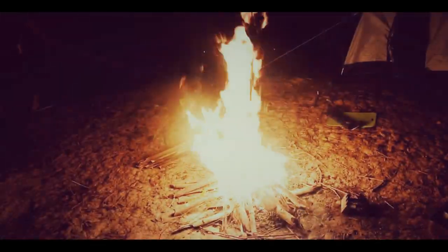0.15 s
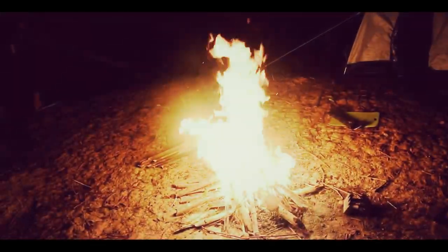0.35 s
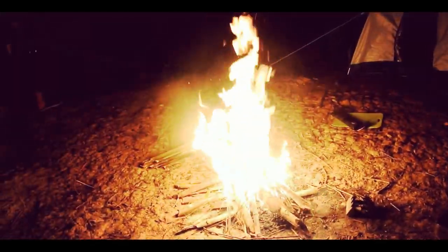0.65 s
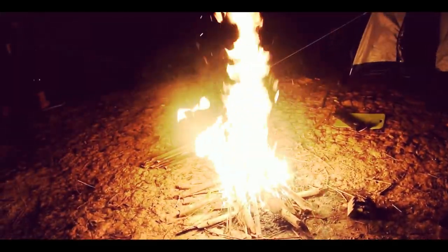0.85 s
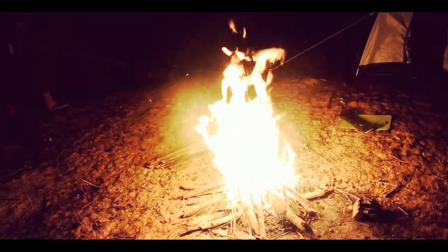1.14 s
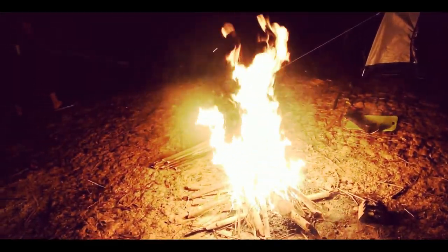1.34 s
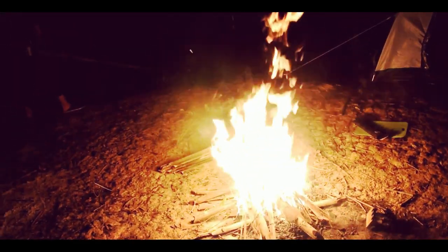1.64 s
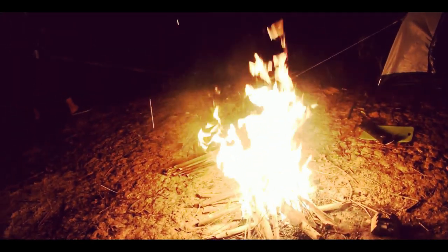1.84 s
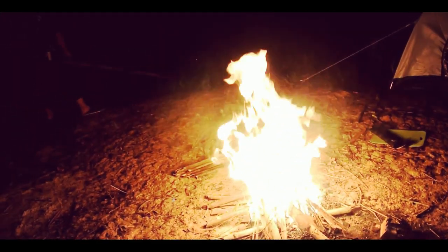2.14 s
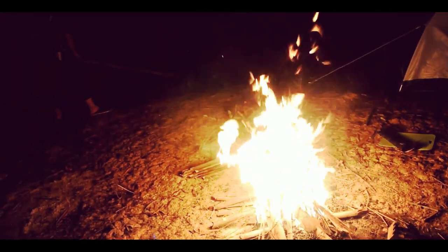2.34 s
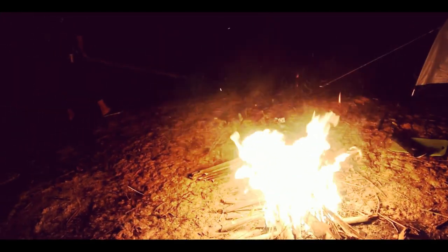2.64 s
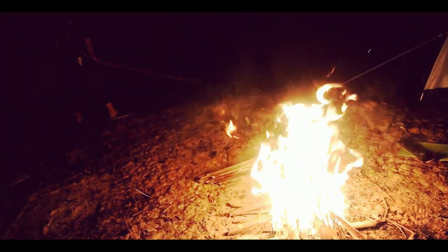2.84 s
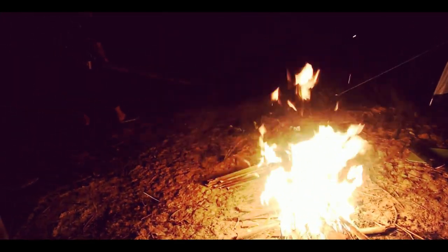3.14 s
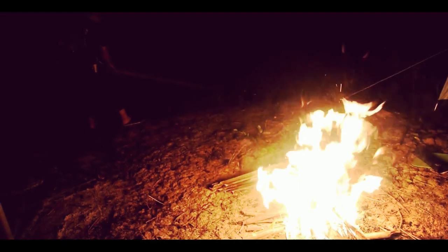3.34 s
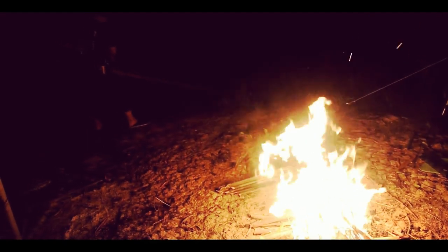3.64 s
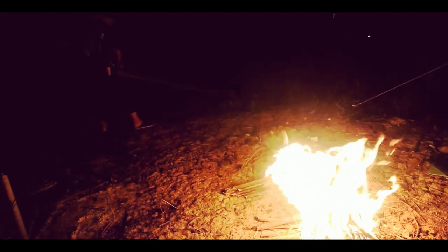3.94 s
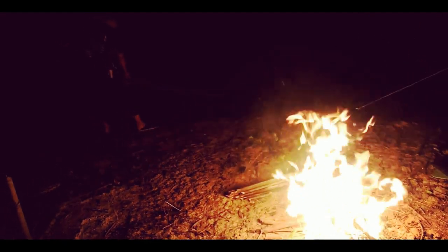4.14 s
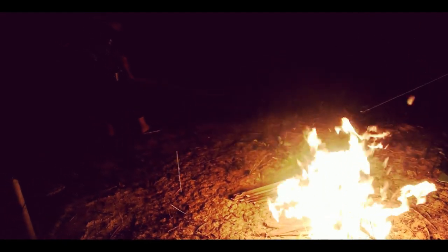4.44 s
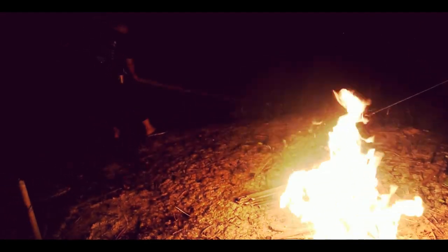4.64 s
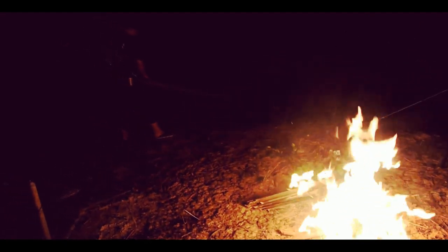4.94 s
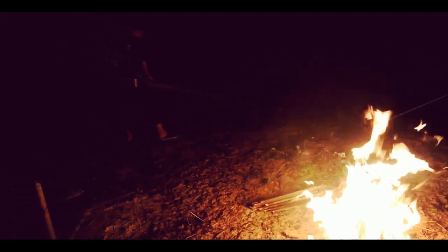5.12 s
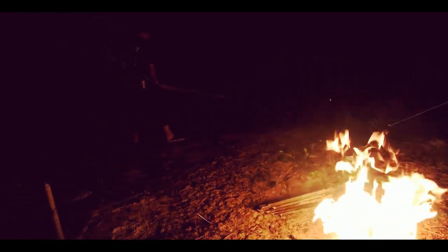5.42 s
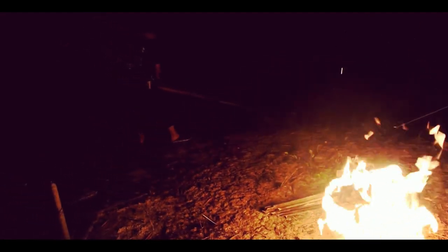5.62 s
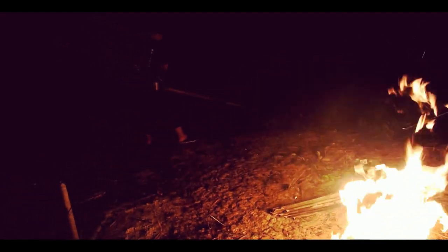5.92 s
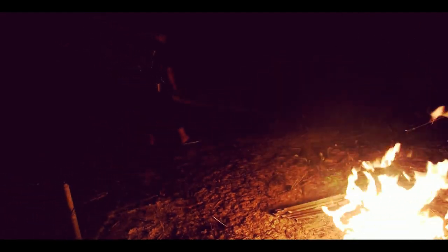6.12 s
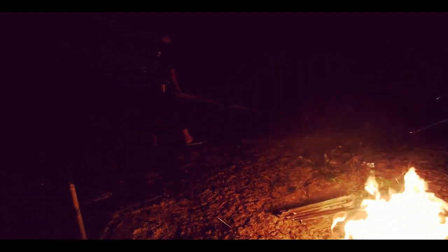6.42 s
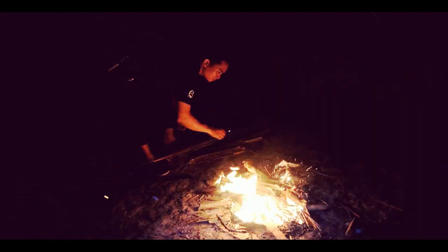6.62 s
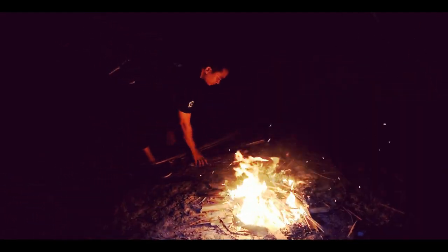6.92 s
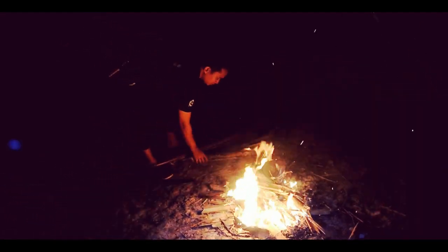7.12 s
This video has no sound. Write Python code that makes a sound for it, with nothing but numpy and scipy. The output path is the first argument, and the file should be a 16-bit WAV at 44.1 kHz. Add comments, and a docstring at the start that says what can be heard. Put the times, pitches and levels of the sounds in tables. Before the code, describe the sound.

A stick fire burns close to a stereo microphone outdoors at night. Throughout, flames flutter in the bass and rush softly above, with dense tiny ticks, dull little knocks and dry spark flicks. Behind, crickets trill continuously around a high whistle-like pitch, katydids hiss higher still, and faint far trills rise and fall. Bright snaps cluster from 0.4 to 0.8 seconds with a small burst at 0.65; another hollow pop comes at 1.3. A strong bang with steam hits at 2.0, a lesser one at 2.2. Sharp snaps crack at 3.3 and 4.2, around a very loud, overloading bang and hiss at 4.0. Smaller bursts and a piercing snap come at 5.3 to 5.6, then another huge bang at 6.0. A near cricket chirps around 0.5-1.9, 3.0-4.3 and 6.3-7.2. After 6.7 the fire's flutter and crackle drop slightly, with a sharp snap at 6.95.

```python
"""Outdoors at night, a tall stick fire: splitting wood ticks and knocks, made of short fading noise.
Sealed stalks burst with a bang of ringing tones and an air thump, then hiss out steam as fading noise.
The flames flutter and rush as slowly wavering noise. Behind them crickets trill and chirp
(wavering tones and narrow noise) and katydids hiss; the loudest bangs overload the microphone."""
import sys
import numpy as np
from scipy import signal
from scipy.fft import rfft, irfft, next_fast_len
from scipy.io import wavfile
from scipy.ndimage import map_coordinates

SR = 44100
rng = np.random.default_rng(int(sys.argv[2]) if len(sys.argv) > 2 else 0)


def master(y):
    """Save y as 16-bit WAV."""
    cut = np.clip(np.atleast_2d(y).T, -1, 1)
    pcm = np.round(cut * 32767)  # scale
    wavfile.write(sys.argv[1], SR, pcm.astype(np.int16))


N = 320607  # length in samples

# Fibres snapping at the surface. Positive left_right_db is louder on the left.
# Columns: start_s, snap_level_db, snap_pitch_hz, left_right_db [s, relative dB, Hz, dB]
SURFACE_SNAPS = [(0.055, -13, 7000, -1), (0.111, -12.5, 6000, -2), (.446, -10, 10400, 15),
                 (.448, -2, 10500, -6), (.502, -6.5, 4260, 3), (.512, -11, 6950, 5), (0.543, -9.5, 7060, 3),
                 (.672, -7, 5900, 5), (0.694, -6, 13400, 7), (.779, -12, 4900, 3), (1.187, -11.5, 6500, 4),
                 (1.874, -7, 3940, -1), (2.345, -9, 6000, 1), (3.329, -3, 12200, 3), (3.7, -18, 8500, 11),
                 (4.197, -2.5, 8800, 5), (5.537, 2.5, 12600, 3), (6.955, 0.5, 5630, -5),
                 (7.209, -13.5, 13500, 6)]
SNAP_KNOCK_DB, SNAP_KNOCK_HZ = -35, 1770  # faint knock under a snap: dB against the snap, pitch
# Sticks splitting inside the pile.
# Columns: start_s, knock_level_db, knock_pitch_hz [s, relative dB, Hz]
DEEP_KNOCKS = [(1.045, -36.5, 1200), (1.381, -34.5, 500), (2.084, -20, 653), (2.248, -26, 1040),
               (2.819, -26.5, 2060), (3.228, -29.5, 1730), (3.315, -29, 760), (3.431, -28.5, 3460),
               (4.511, -29.5, 735), (4.562, -31.5, 1070), (4.983, -31, 1700), (5.29, -26.5, 860),
               (5.511, -28, 700), (6.589, -31, 740)]
KNOCK_SNAP_DB, KNOCK_SNAP_HZ = 9.5, 3020  # snap on a knock: dB against the knock, pitch
# Sealed stalks bursting; the bangs, steam and torn fibres below use it too.
# Columns: start_s, snap_level_db, snap_pitch_hz, knock_level_db, knock_pitch_hz, hollow_level_db,
# hollow_pitch_hz, steam_level_db, full_flow_s, left_right_db [s, Hz, relative dB]
STALK_BURSTS = [(.652, -3, 2530, -24.5, 1300, -22.5, 617, -31, .04, 4.5),
                (1.325, -11, 10200, -25, 1110, -14.5, 546, -32, .022, 6),
                (2.0, -2.5, 2250, -13, 1550, -11, 400, -17, .054, 3),
                (2.2, -8, 1260, -18, 1010, -15, 1180, -32, 0.022, -3),
                (3.979, 4.5, 3100, -13.5, 857, -3, 1400, -17, .048, -1),
                (5.272, -16, 2200, -24, 2360, -20, 1700, -32.5, .018, -12),
                (5.554, -6.5, 11200, -25, 1070, -29, 600, -19, .025, 11),
                (6.001, 4.5, 2400, -12.5, 1550, -4, 700, -16, .046, -7)]


def pops():
    """Surface splits are nearly all snap, deep ones mostly knock, bursts both; returns (snaps, knocks)."""
    splits = []
    for s, db, hz, pan_db in SURFACE_SNAPS:
        splits.append((s, split(db, hz, db + SNAP_KNOCK_DB, SNAP_KNOCK_HZ, pan_db)))
    for s, db, hz in DEEP_KNOCKS:
        splits.append((s, split(db + KNOCK_SNAP_DB, KNOCK_SNAP_HZ, db, hz, pan_db=1.6)))
    for s, snap_db, snap_hz, knock_db, knock_hz, *_, pan_db in STALK_BURSTS:
        splits.append((s, split(snap_db, snap_hz, knock_db, knock_hz, pan_db)))
    snaps, knocks = np.zeros((2, 2, N))
    for s, (snap, knock) in splits:
        add(snaps, s, snap)
        add(knocks, s, knock)
    return snaps, knocks


# Tone colour of snapping fibres, shared by all ticks. Columns: pitch_hz, level_db [Hz, relative dB per Hz]
SNAP_COLOUR = [(100, -1), (600, -11), (2000, -2.5), (4000, 2.5), (8000, 0), (11500, 3.5), (15500, -2)]
# Tone colour of a knocking stick. Columns: pitch_hz, level_db [Hz, relative dB per Hz]
KNOCK_COLOUR = [(25, -33), (120, -30), (260, -4.5), (420, -14.5), (650, 1), (1800, -0.5), (3200, -5),
                (7000, -19.5)]


def split(snap_db, snap_hz, knock_db, knock_hz, pan_db):
    """A bright snap of fibres and a slower hollow knock of the stick; returns (snap, knock)."""
    heft = min(amp(knock_db + 17.5), 1)  # heavy splits run on for longer
    snap_s = .006 + .013 * heft
    knock_s, ring_db = 1.7 * snap_s, 9.5
    snap = burst(SNAP_COLOUR, snap_hz, q=2.3, ring_db=ring_db, t60=snap_s)
    knock = burst(KNOCK_COLOUR, knock_hz, q=4.5, ring_db=ring_db, t60=knock_s)
    return amp(snap_db - 5.0) * panned(pan_db + 1.7) * snap, amp(knock_db + 7.0) * knock


def burst(spectrum, ring_hz, q, ring_db, t60):
    """A fracture: noise that starts at once and dies fast, with one resonance of the stick standing out."""
    t = np.arange(SR // 20) / SR
    fade = amp(-60 * t / max(t60, .002)) * (1 - np.exp(-t / 0.00015))

    def colour(hz):
        return shape(spectrum)(hz) * (1 + amp(ring_db) * band(ring_hz, ring_hz / q)(hz))

    x = fade * noise(colour, size=len(t))
    # each side gets the same energy, whatever the random noise was
    return np.array([unit(side) for side in x]) * np.sqrt(np.mean(fade ** 2))


# Tones (modes) that a stalk's hollow can ring at. Columns: pitch_hz, level_db [Hz, relative dB]
HOLLOW_MODES = [(245, -2), (318, 3), (490, -3.5), (605, -0.5), (767, -0.5), (1390, -1.5), (1870, 0.5)]
HOLLOW_T60_S = 0.038  # time to fall 60 dB at 500 Hz; low modes last longer
HOLLOW_FALL_DB = 16  # per octave that a mode lies from the pitch of the hollow
# air thump: dB at a listed snap level of 0 dB, dB gained per dB of snap, time scale
THUMP_DB, THUMP_GROWS, THUMP_S = -43, 5.1, .0034


def bangs():
    """A bursting stalk shoves the air once; the modes near the pitch of its hollow ring for a few cycles."""
    out, t = np.zeros((2, N)), np.arange(SR // 10) / SR
    u = t / THUMP_S
    shove = (1 - u) * np.exp(-u)  # a push, then a gentler pull
    for s, snap_db, _, _, _, hollow_db, hollow_hz, *_ in STALK_BURSTS:
        add(out, s, amp(THUMP_DB + THUMP_GROWS * snap_db) * shove * panned(1.9))
        for hz, db in HOLLOW_MODES:
            t60 = HOLLOW_T60_S * np.sqrt(500 / hz)
            mode_db = hollow_db + db - HOLLOW_FALL_DB * abs(np.log2(hz / hollow_hz))
            swing = amp(mode_db - 60 * t / t60) * np.sin(2 * np.pi * hz * t)
            pressure = np.gradient(swing) * SR / (2 * np.pi * hz)  # follows the change of flow
            late_s = 0.002964 * rng.random()  # modes start as the crack runs along
            add(out, s + late_s, pressure * panned(.69))
    return out


# Tone colour of the steam's hiss. Columns: pitch_hz, level_db [Hz, relative dB per Hz]
STEAM_COLOUR = [(100, -33), (300, -1.5), (450, -17.5), (700, -18.5), (1200, -22), (2000, -4.5), (4000, 1),
                (7000, 0), (10500, 0.5), (13000, -1), (15800, -10.5)]
# Tone colour of the steam's roar. Columns: pitch_hz, level_db [Hz, relative dB per Hz]
ROAR_COLOUR = [(30, -77), (130, -43), (280, -20), (420, -7), (700, -2), (1400, -0.5), (3000, -1),
               (7000, -9)]
FADE_OVER_FLOW = 10.4  # the steam's 60 dB fade time over its time at full flow
ROAR_DB, ROAR_GROWS = 7.5, 2.005  # roar at a listed knock level of 0 dB; dB gained per dB of knock


def jets():
    """Steam blows at full flow, then fades with the pressure; harder bursts add a stronger, lower roar."""
    out, t = np.zeros((2, N)), np.arange(SR // 2) / SR
    onset = 1 - np.exp(-t / 0.00085)
    for s, _, _, knock_db, *_, steam_db, hold, _ in STALK_BURSTS:
        past_full_s = np.hypot(np.maximum(t - hold, 0), .01) - .01  # rounded corner into the fade
        flow_db = -60 * past_full_s / (FADE_OVER_FLOW * hold)
        sputter_db = .8 * wobble(130, size=len(t))
        hiss = amp(steam_db + flow_db) * noise(shape(STEAM_COLOUR), size=len(t)) * panned(2.9)
        roar_db = ROAR_DB + ROAR_GROWS * knock_db + 0.67 * flow_db - 33 * t
        roar_db = roar_db + 1.9 * wobble(72, size=len(t))
        roar = amp(roar_db) * noise(shape(ROAR_COLOUR), size=len(t))
        add(out, s, amp(sputter_db) * onset * (hiss + roar))
    return out


# Runs of small splits as sticks settle; each split is up to 6 dB above the level before tick and knock trims.
# Columns: start_s, length_s, level_db [s, s, relative dB]
SETTLING_RUNS = [(0.626, 0.06, -30.5), (2.631, 0.18, -35.5), (3.155, 0.11, -35), (4.171, 0.049, -30),
                 (4.48, .091, -34.5), (4.85, 0.24, -33.5), (5.245, 0.069, -29), (5.459, 0.092, -29),
                 (6.177, 0.032, -31.5), (6.305, 0.062, -35.5), (6.568, 0.047, -35.5)]


def crackle(count=130, order=8):
    """Many small splits deep in the pile, duller runs where sticks settle, and fibres torn by the steam."""
    out = np.zeros((2, N))
    for when, size, bright, pitch, place in rng.random((count, 5)):
        add(out, when * N / SR, small_split(-36 + 12 * size ** 3, bright, pitch, place))
    for s, length, db in SETTLING_RUNS:
        for k, (when, size, bright, pitch, place) in enumerate(rng.random((order, 5))):
            start_s = s + length * (k + when) / order
            add(out, start_s, small_split(db + 6 * size, bright ** 3 / 2, pitch, place))
    for s, *_, steam_db, hold, _ in STALK_BURSTS:
        for when, size, bright, pitch, place in rng.random((order, 5)):
            tear_db = steam_db - 4 + 9 * size - 9 * when
            add(out, s + 2 * hold * when, small_split(tear_db, bright, pitch, place))
    return out


def small_split(db, bright, pitch, place):
    """A thin tick and a dull little knock; bright, pitch and place run from 0 to 1."""
    tick = burst(SNAP_COLOUR, 3000 * 4 ** pitch, q=1, ring_db=16, t60=0.01)
    knock = burst(KNOCK_COLOUR, 500 * 4 ** pitch, q=2.8, ring_db=2.5, t60=0.028)
    tick = amp(db + 6.8 * (bright + 0.5)) * tick * panned(2.5 + 6 * (place - .5))
    return tick + amp(db - 3.5 - 7.3 * bright) * knock


def sparks(count=70):
    """Tiny flakes of bark flick off with very short, dry, high ticks."""
    out = np.zeros((2, N))
    for when, size, pitch, place in rng.random((count, 4)):
        db = -32 + 14 * size ** 3  # mostly faint, a few strong
        tick = burst(SNAP_COLOUR, 7000 * 2 ** pitch, q=2, ring_db=14, t60=0.0042)
        add(out, when * N / SR, amp(db) * panned(6 * place) * tick)
    return out


# Tone colour of the bass flutter. Columns: pitch_hz, level_db [Hz, relative dB per Hz]
FLUTTER_COLOUR = [(15, -19), (35, -5.5), (80, -1), (250, 0.5), (450, -6), (1000, -19)]
# Tone colour of the rush above it. Columns: pitch_hz, level_db [Hz, relative dB per Hz]
RUSH_COLOUR = [(150, -26), (500, -0.5), (1200, -1), (2500, -1), (4200, -1), (6500, -1.5), (12000, 1),
               (15500, -6.5)]
FLUTTER_DB, RUSH_DB = -49, -39.5  # levels that the wobbles move around
# when the flutter, crackle and katydids turn quieter, and by how much for the two fire sounds
QUIETER_S, FIRE_DROP_DB = 6.73, 4


def flames():
    """Burning gas flutters in the bass and rushes evenly above it; both swell as the flames lick."""
    lick_db = 1.2 * wobble(3.4)
    flutter_db = FLUTTER_DB + quieter(FIRE_DROP_DB) + lick_db + 1.9 * wobble(25)
    flutter = amp(flutter_db) * noise(shape(FLUTTER_COLOUR))
    rush = amp(RUSH_DB + lick_db / 2 + wobble(45)) * noise(shape(RUSH_COLOUR))
    return flutter + rush * panned(.98)


def quieter(drop_db):
    """A level change in dB that sets in at QUIETER_S and stays."""
    return -drop_db * during(QUIETER_S, np.inf, ease_s=0.12)


# Bouts of a near cricket; times are chirp middles, pitch and level are averages.
# Columns: first_chirp_s, last_chirp_s, pitch_hz, level_db [s, s, Hz, dB]
CRICKET_BOUTS = [(0.465, 1.923, 5240, -42), (3.047, 4.282, 5110, -41), (6.281, 7.166, 5460, -43)]
CHIRP_PERIOD_S, CHIRP_S, STROKES_HZ = .24, .23, 67  # rough chirp spacing, length, mean wing stroke rate


def near_cricket():
    """Each chirp is narrow noise that swells and dies while wing strokes make it throb."""
    out, t, swell = np.zeros((2, N)), *chirp_swell()
    for first, last, hz, db in CRICKET_BOUTS:
        for s in np.linspace(first, last, round((last - first) / CHIRP_PERIOD_S) + 1):
            strokes = 1 + 0.22 * np.sin(2 * np.pi * (rng.normal(STROKES_HZ, 10.9) * t + rng.random()))
            voice = noise(band(rng.normal(hz, 70), 650), size=len(t))
            add(out, s - CHIRP_S / 2, amp(db + rng.normal()) * swell * strokes * voice * panned(4.6))
    return out


def chirp_swell():
    """Times in seconds and the half-sine swell of one chirp."""
    t = np.arange(int(CHIRP_S * SR)) / SR
    return t, np.sin(np.pi * t / t[-1])


# Single notes of a cricket with a purer voice; times are note middles.
# Columns: middle_s, pitch_hz, level_db [s, Hz, dB]
PURE_NOTES = [(.9, 4920, -41.5), (1.27, 4840, -46.5), (2.66, 4725, -43.5), (6.46, 4980, -44)]


def pure_cricket():
    """Very narrow noise sounds almost like a whistle; each note swells and dies."""
    out, t, swell = np.zeros((2, N)), *chirp_swell()
    for s, hz, db in PURE_NOTES:
        voice = noise(band(hz, 33), size=len(t))
        add(out, s - CHIRP_S / 2, amp(db) * np.sqrt(np.abs(swell)) * voice * panned(2.8))
    return out


CHORUS_HZ, CHORUS_DB = 4823, -44.5  # the cricket chorus at rest, before its wobbles
ANSWER_DB, ANSWER_S = 1.5, 0.65  # how far the chorus swells in answer to a bout, and how slowly


def chorus():
    """Narrow noise for many crickets and a trill on each side; it swells with each near cricket's bout."""
    answer_db = ANSWER_DB * sum(during(first, last, ANSWER_S) for first, last, _, _ in CRICKET_BOUTS)
    level_db = CHORUS_DB + 1.0 * wobble(3.8) + answer_db + 1.4 * wobble(30)
    singers = np.array([trill(CHORUS_HZ, drift_hz=55, flutter_db=4) for side in "LR"])
    crowd = noise(band(CHORUS_HZ, 450))
    return amp(level_db) * unit(crowd + amp(-1) * singers) * panned(1.7)


def trill(hz, drift_hz, flutter_db):
    """One cricket's wing tone of rms 1, wandering in pitch and strength."""
    pitch = hz + drift_hz * (wobble(5) + wobble(120)) + 35 * wobble(12)
    return unit(amp(flutter_db * wobble(45)) * np.sin(2 * np.pi * np.cumsum(pitch) / SR))


# Tone colour of the katydids' hiss. Columns: pitch_hz, level_db [Hz, relative dB per Hz]
KATYDID_COLOUR = [(7500, -19), (8500, -8), (9700, 0), (10800, 3), (12200, -3.5), (13300, -5.5),
                  (15500, -30)]
KATYDID_DB, KATYDID_DROP_DB = -40.5, 1.5  # level before the wobble and drop; size of the drop


def katydids():
    """Many rasping wings blur into a high hiss, made of wavering noise."""
    level_db = KATYDID_DB + quieter(KATYDID_DROP_DB) + 1.15 * wobble(50)
    return amp(level_db) * noise(shape(KATYDID_COLOUR)) * panned(2.9)


# Far trills; each level is the middle of a slow wobble.
# Columns: pitch_hz, width_hz, level_db [Hz, Hz, dB]
FAR_TRILLS = [(3290, 390, -54), (3816, 31, -58.5), (7170, 580, -53.5), (8580, 250, -52.5)]


def far_insects():
    """Far trills are bands of noise that slowly rise and fall."""
    out = np.zeros((2, N))
    for hz, width_hz, db in FAR_TRILLS:
        out += amp(db + 2.3 * wobble(1.63)) * noise(band(hz, width_hz))
    return out


# How long the scattered tail takes to fall 60 dB. Columns: pitch_hz, fade_s [Hz, s]
TREE_FADE = [(200, 0.29), (2000, 0.35), (12000, 0.16)]


def trees(x):
    """Ground and trees scatter a faint, short tail: noise that fades at its own pace at each pitch."""
    hz, t, z = signal.stft(noise(np.ones_like, size=SR // 2), SR, nperseg=256)
    fade = amp(-60 * t / along(TREE_FADE, hz)[:, None])
    tail = signal.istft(z * fade, SR, nperseg=256)[1]
    return signal.fftconvolve(x, tail / np.linalg.norm(tail[0]), axes=1)[:, :N]


# How alike the left and right noise are. Columns: pitch_hz, likeness [Hz, 0 unrelated to 1 same]
LIKENESS = [(50, .75), (250, .86), (550, .94), (1200, .78), (2500, .3), (5000, .05)]


def noise(gain, size=N):
    """Stereo noise of rms 1 coloured by gain(Hz): alike in the bass, unrelated in the treble."""
    def mid_side_gain(hz):
        turn = np.arccos(np.clip(along(LIKENESS, hz), -1, 1)) / 2
        return gain(hz) * np.array([np.cos(turn), np.sin(turn)])

    mid, side = filtered(rng.standard_normal((2, size)), mid_side_gain)
    return unit(np.array([mid + side, mid - side]))


def filtered(x, response):
    """x times a response of frequency."""
    n = x.shape[-1]
    m = next_fast_len(n + SR // 20)
    return irfft(rfft(x, m) * response(np.fft.rfftfreq(m, 1 / SR)), m)[..., :n]


def shape(points):
    """The gain of a (Hz, dB) spectrum."""
    return lambda hz: amp(along(points, hz))


def band(centre_hz, width_hz):
    """The gain of a resonance, halved at the edges of its width."""
    return lambda hz: 1 / (1 + ((hz - centre_hz) / (width_hz * .5)) ** 2)


def along(points, hz):
    """Read (Hz, value) points along a log axis."""
    f, v = np.transpose(points)
    return np.interp(np.log(hz + 1), np.log(f + 1), v)


def wobble(rate, size=N):
    """A smooth random curve, rate knots a second."""
    knots = rng.standard_normal(int(size * rate / SR) + 4)
    return map_coordinates(knots, [np.arange(size) * rate / SR])


def during(start_s, end_s, ease_s):
    """1 between two times and 0 outside, with ramps ease_s long."""
    t = np.arange(N) / SR
    return np.clip(.5 + np.minimum(t - start_s, end_s - t) / ease_s, 0, 1)


def amp(db):
    """Decibels to a plain factor."""
    return 10 ** (np.asarray(db) / 20)


def unit(x):
    """x scaled to rms 1."""
    return x / np.sqrt(np.mean(x ** 2) + 1e-20)


def panned(db):
    """Left and right gains for a level difference; positive is louder on the left."""
    return amp(np.array([[db], [-db]]) / 2)


def add(track, s, sound):
    """Mix a sound into the track at time s."""
    part = track[:, max(round(s * SR), 0):][:, :sound.shape[1]]
    part += sound[:, :part.shape[1]]


def scene():
    """The fire and its echo in front, the insects behind."""
    snaps, knocks = pops()
    knocks = knocks + bangs() + amp(quieter(FIRE_DROP_DB)) * crackle()
    echo = trees(amp(-15) * snaps + amp(-11) * knocks)
    fire = snaps + sparks() + knocks + echo + jets() + flames()
    insects = near_cricket() + pure_cricket() + chorus() + katydids() + far_insects()
    return fire + insects


TOP_HZ = 15850  # band limit


def record(dry):
    """The loudest bangs clip at full scale; nothing is kept above the band limit."""
    return filtered(np.clip(dry, -1, 1), lambda hz: hz < TOP_HZ)


dry = scene()
out = record(dry)
master(out)
```